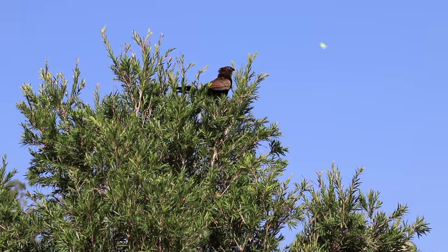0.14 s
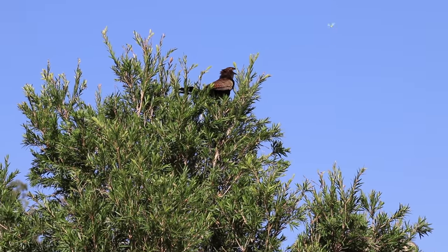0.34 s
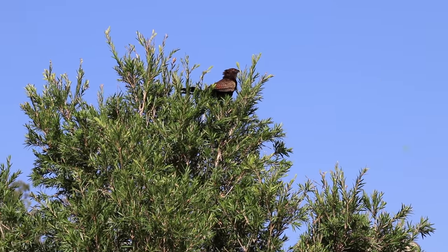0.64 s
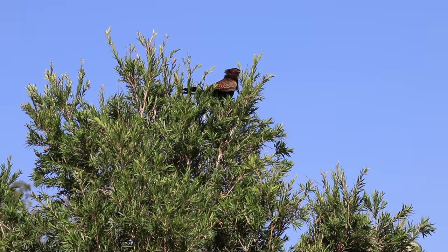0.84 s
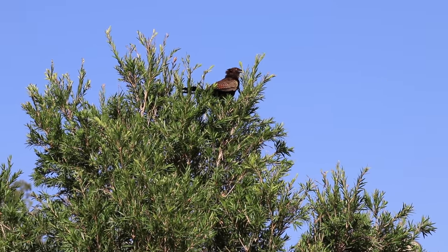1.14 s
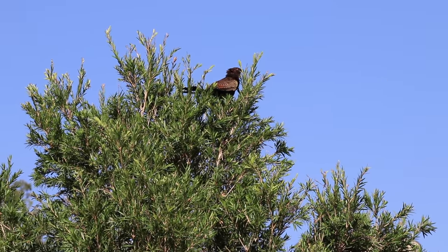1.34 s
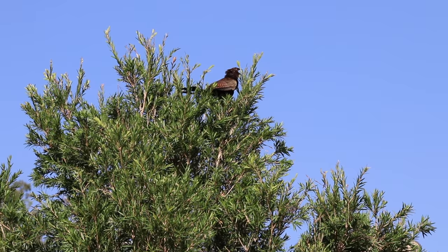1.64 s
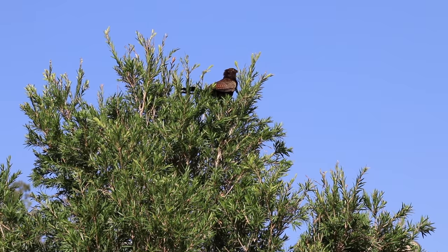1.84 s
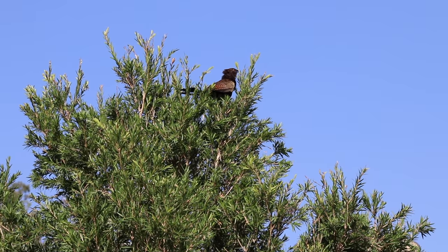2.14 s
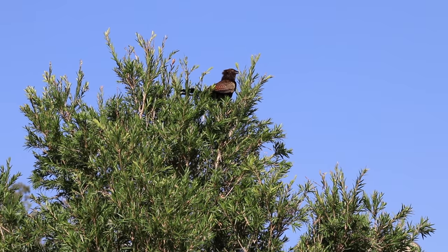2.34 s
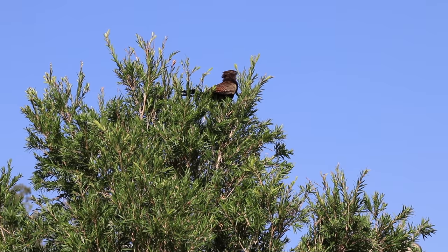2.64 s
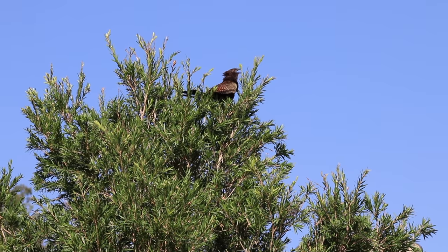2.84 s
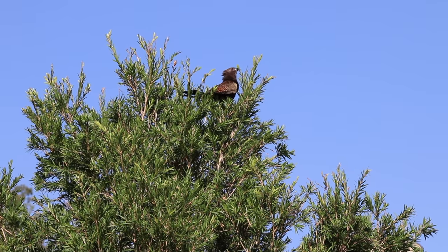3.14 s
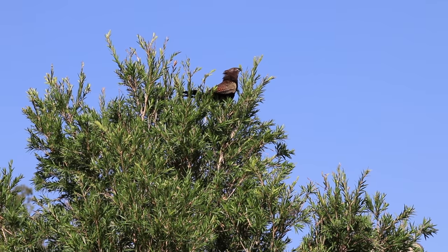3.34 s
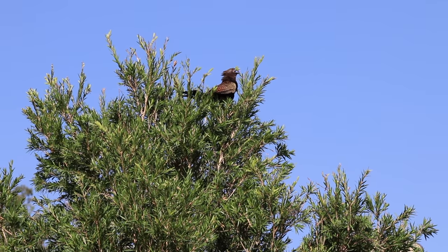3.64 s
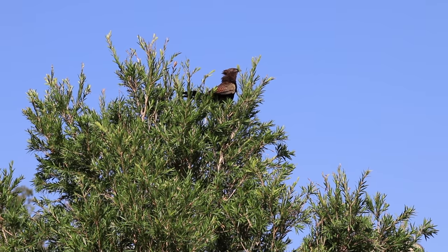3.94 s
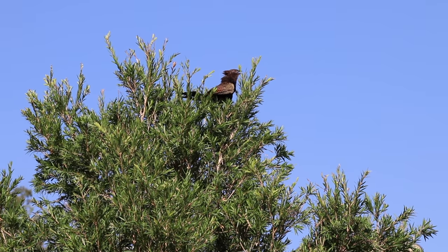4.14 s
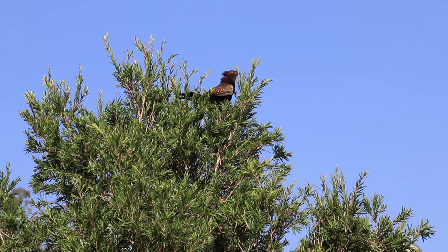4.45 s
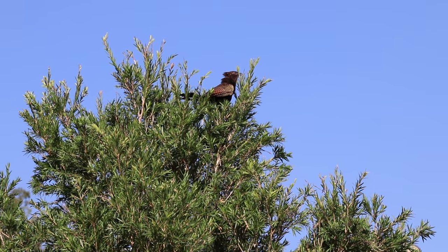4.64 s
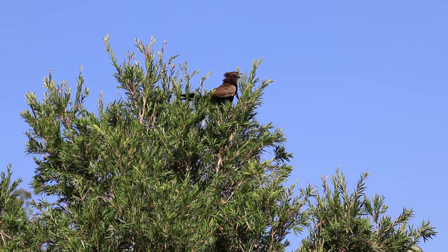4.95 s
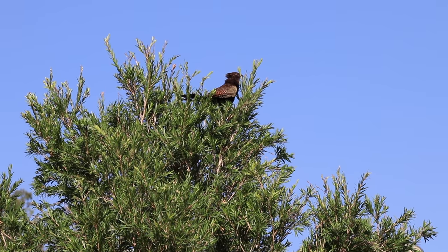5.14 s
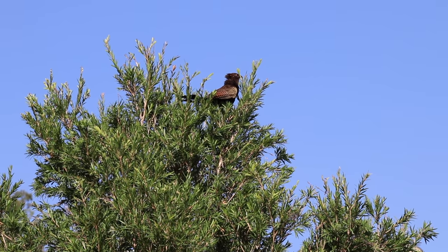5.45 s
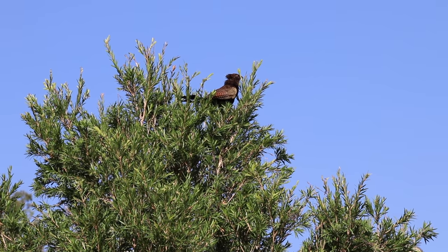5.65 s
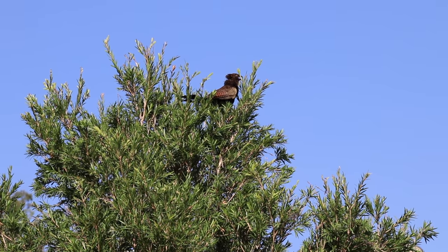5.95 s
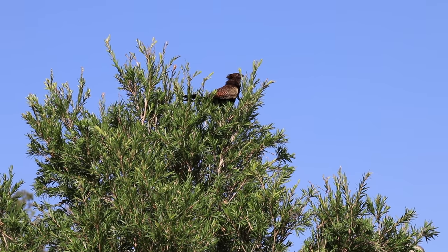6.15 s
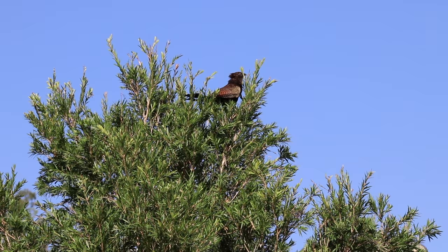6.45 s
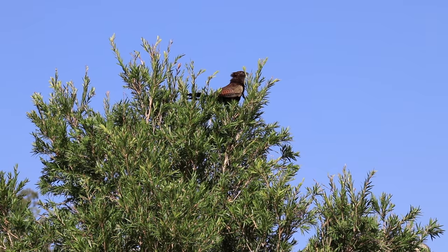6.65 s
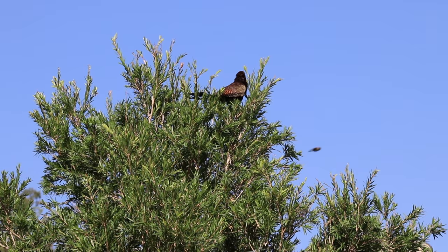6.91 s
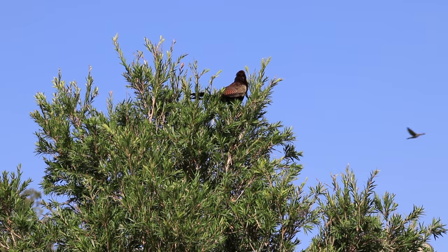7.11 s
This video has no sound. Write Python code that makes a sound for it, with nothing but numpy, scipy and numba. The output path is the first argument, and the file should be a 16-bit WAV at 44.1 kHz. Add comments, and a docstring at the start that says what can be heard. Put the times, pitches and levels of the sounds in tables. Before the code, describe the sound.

A pheasant coucal in a treetop gives a long run of short, raspy, falling coop notes echoing softly through foliage, over faint insect trills.

```python
"""Among trees, a pheasant coucal on a treetop gives a run of harsh, falling notes, which the foliage echoes.
Each note starts as a rasp of chaotic pulses in the syrinx, clears into a tone as its resonance sinks,
and closes with a faint low hoot. Insects trill at high pitch by scraping their wings, crickets chirp,
a small bird twitters once in thin pitch slurs, and a tiny tick of decaying noise sounds near the end.
Behind them lie coloured noise, as far rumble and leaf hiss, and the wavering sines of distant machinery."""
import sys
import numpy as np
from scipy import signal
from scipy.fft import rfft, irfft
from scipy.io import wavfile
from scipy.ndimage import uniform_filter1d, map_coordinates
from numba import njit

SR = 44100
rng = np.random.default_rng(int(sys.argv[2]) if len(sys.argv) > 2 else 0)


def wav_record(signal):
    """Record a signal, one row per channel, as 16-bit PCM in the file named by sys.argv[1]."""
    frames = np.transpose(np.atleast_2d(signal))
    bounded = np.clip(frames, -1, 1)
    # unit amplitude maps onto the largest positive 16-bit level
    quanta = np.round(bounded * 32767).astype(np.int16)
    wavfile.write(sys.argv[1], SR, quanta)


N = 321048


def undb(db):
    """Decibels to amplitude ratio: 20 dB is a factor of ten."""
    return 10 ** (np.asarray(db) / 20)


def unit(x):
    """Normalization to a root-mean-square amplitude of 1."""
    return x / np.sqrt(np.mean(x ** 2) + 1e-18)


def add(out, x, s):
    """Superposition: sum x into out from time s on, cut at the ends of out."""
    start = int(round(s * SR))
    a, b = max(start, 0), min(start + len(x), N)
    out[a:b] += x[a - start:b - start]


def walk(rate, size):
    """Smoothed random motion: held random steps, averaged; spread about 1, about rate turns a second."""
    k = max(int(SR / rate), 2)
    steps = np.repeat(rng.standard_normal(size // k + 2), k)
    return 1.25 * uniform_filter1d(steps, k)[k // 2:k // 2 + size]


def along(points, hz):
    """Interpolation of (f/Hz, value) points on a logarithmic frequency axis."""
    f, value = np.transpose(points)
    return np.interp(np.log(hz + 1), np.log(f), value)


def tone_of(hz):
    """A sine whose phase is the running integral of its instantaneous frequency."""
    return np.sin(2 * np.pi * np.cumsum(hz) / SR)


@njit
def svf(x, hz, width):
    """Second-order resonance (state-variable band-pass) whose centre may move every sample."""
    y, band, low = np.empty(len(x)), 0., 0.
    for i in range(len(x)):
        g, k = np.tan(np.pi * hz[i] / SR), width / hz[i]
        v = (band + g * (x[i] - low)) / (1 + g * (g + k))
        band, low, y[i] = 2 * v - band, low + 2 * g * v, k * v
    return y


def resonate(x, hz, width):
    """Cascaded resonance: two equal band-passes in series steepen the skirts."""
    centre = np.minimum(hz + np.zeros(len(x)), .45 * SR)
    return svf(svf(x, centre, float(width)), centre, float(width))


def steep(x, hz, kind):
    """Eighth-order Butterworth filter: a steep high- or low-pass."""
    return signal.sosfilt(signal.butter(8, hz, kind, fs=SR, output="sos"), x)


def swell(u, peak, spread):
    """Gaussian envelope over the relative time u of a note."""
    return np.exp(-((u - peak) / spread) ** 2)


def distant_air(level_db=-42.5):
    """Diffuse field: coloured noise as far rumble and leaf hiss, more alike at both ears in the bass."""
    # spectrum of the distant air: f/Hz, relative spectral density/dB
    air_spectrum = [(15, -29), (25, -14.5), (86, -7), (107, -13.5), (193, -3), (221, -10.5), (482, -9),
                    (552, -17.5), (1020, -22), (1850, -28), (2010, -29.5), (2300, -31), (7300, -38),
                    (8130, -34), (15500, -43.5)]
    # stereo width of the distant air: f/Hz, side minus mid level/dB
    air_width = [(30, -9), (150, -13), (350, -11.5), (700, -5), (2000, 3), (12000, 0)]
    hz = np.fft.rfftfreq(N, 1 / SR)
    colour = undb(along(air_spectrum, hz))
    width = undb(along(air_width, hz))
    noise = rfft(rng.standard_normal((2, N))) * colour
    mid, side = irfft(noise * np.array([np.ones_like(width), width]), N)
    left_right = mid + side * np.array([[1], [-1]])
    return left_right / np.std(mid) * undb(level_db + 0.87 * walk(4, N))


def machinery():
    """Narrow-band hum: sines of distant machinery, wavering in frequency and level."""
    # partials of the hum: f/Hz, rms level/dB before the wavering
    partials = [(99, -58), (199.5, -51), (301, -56.5), (1815, -64.5)]
    hum = np.zeros(N)
    for f, db in partials:
        level = undb(db + 2 * walk(4.8, N))
        hum += level * np.sqrt(2) * tone_of(f + 3 * walk(14, N))
    return hum


def tick(s=7.09, gain_db=-37, decay_s=.002):
    """Impulsive excitation: a decaying noise burst, band-passed into one tiny, bright tick."""
    out, t = np.zeros(N), np.arange(SR // 20) / SR
    burst = rng.standard_normal(len(t)) * np.exp(-t / decay_s)
    add(out, undb(gain_db) * resonate(burst, 10200, 4500), s)
    return out


def cricket(rate, pitch_hz, db):
    """Amplitude-gated carrier: a far cricket repeats short chirps that sag in pitch."""
    stroke = np.cumsum(rate * (1 + .08 * walk(4.5, N))) / SR % 1
    pitch = pitch_hz * (1 + .25 * (.25 - stroke) + .025 * walk(900, N))
    gate = np.sin(np.pi * np.minimum(2 * stroke, 1)) ** 2  # silent for the second half of each cycle
    return undb(db + 2 * walk(6.5, N)) * unit(gate * tone_of(pitch))


def crickets(chorus_db=-68):
    """Incoherent summation: a chorus blurs into band noise, from which two crickets stand out a little."""
    chorus = undb(chorus_db) * unit(resonate(rng.standard_normal(N), 4250, 470))
    return chorus + cricket(14, 4300, -74.0) + cricket(17, 4550, -67)


def trills(stroke_hz=78, every_s=.245, trill_s=0.18):
    """Stridulation: insects scrape their wings in evenly spaced bursts; every stroke rings one high pitch."""
    # bouts of trills: t/s, length/s, f/Hz, level/dB
    bouts = [(-.08, .4, 7760, -62.5), (1.24, .2, 7730, -64), (2.083, .2, 8240, -68), (2.755, .2, 8210, -60),
             (4.084, .65, 8260, -61.5), (6.197, 1.1, 8220, -60.5)]
    out = np.zeros(N)
    t = np.arange(int(trill_s * SR)) / SR
    stroke = t * stroke_hz % 1
    envelope = np.sqrt(np.sin(np.pi * t / trill_s))
    for s, length, hz, db in bouts:
        for start in np.arange(s, s + length, every_s):
            pitch = hz * (1 + 0.066 * (.5 - stroke) + 0.0092 * walk(400, len(t)))  # sags in each stroke
            ring = tone_of(pitch) * np.sin(np.pi * stroke) ** 2
            add(out, undb(db) * unit(ring * envelope), start)
    return out


def small_bird():
    """Frequency modulation: a quick twitter of thin, wavering notes, most of them slurred."""
    # notes of the twitter: t/s, length/s, start f/Hz, end f/Hz, level/dB
    twitter = [(5.73, 0.039, 5200, 7200, -62), (5.762, .042, 6800, 6750, -59),
               (5.81, 0.033, 6700, 4600, -61), (5.812, 0.043, 4800, 3600, -54.5),
               (5.855, .035, 4700, 3200, -55.5), (5.903, 0.12, 3000, 3000, -61)]
    out = np.zeros(N)
    for s, length, start_hz, end_hz, db in twitter:
        u = np.linspace(0, 1, int(length * SR))
        slur = start_hz + (end_hz - start_hz) * u
        pitch = slur * (1 + 0.036 * walk(1200, len(u)))
        add(out, undb(db) * unit(np.sin(np.pi * u) * tone_of(pitch)), s)
    return out


def throat(x, bands, glide):
    """Formant filtering: throat bands sink together; two interleaved sets swell and fade independently."""
    size = len(x)
    hz = np.fft.rfftfreq(size, 1 / SR)
    inside = (hz > bands[0][0]) & (hz < bands[-1][0])
    spectrum = rfft(x) * undb(along(bands, hz)) * inside
    stripes = np.sin(np.pi * hz / 1900) ** 2
    shaped = np.zeros(size)
    for part in (stripes, 1 - stripes):
        shaped += irfft(spectrum * part, size) * undb(.8 * walk(90, size))
    # reading the sound at a falling rate lowers every band by the same ratio
    return unit(map_coordinates(shaped, [np.cumsum(glide)], order=3, mode="mirror"))


def syrinx(size):
    """Aperiodic excitation: irregular slaps of the membranes, each with a puff of air."""
    cycles = np.cumsum(560 * np.exp(.4 * walk(900, size))) / SR
    slaps = np.diff(np.floor(cycles), prepend=0) * undb(1.5 * walk(600, size))
    puffs = np.exp(-(cycles % 1) / 0.47) * rng.standard_normal(size)
    return unit(slaps) + 0.82 * unit(puffs)


def note(length, start_hz, mid_hz, clearest, rasp_db, hiss_db, sizzle_db):
    """Source and filter: chaotic pulses ring a sinking resonance, and briefly lock on to it as a tone."""
    # upper bands of the throat, from low to high: f/Hz, relative level/dB
    rasp_bands = [(1600, -30), (2050, -1), (2600, -1), (3000, -3.5), (3600, -2.5), (3900, -9.5),
                  (4400, -40)]
    hiss_bands = [(3600, -36), (4200, -2), (4900, -1.5), (5500, 5.5), (5900, 8), (6700, 2.5), (7300, 5.5),
                  (7700, 0), (8300, -39), (11000, -16), (12000, -4), (14500, -28)]
    sizzle_bands = [(8000, -5), (8600, -8), (9050, 5.5), (9800, 5.5), (10400, -2), (11200, -9.5),
                    (12000, -9.5), (12900, -32), (13700, -14), (15500, -21)]
    end_hz = 1180.7
    # the main resonance follows the falling pitch only in part (0-1)
    body_hz, body_width_hz, body_follow = 1336, 705, 0.54
    clear_db, clear_spread, hoot_db = 0, 0.38, -17  # spread as a share of the note

    size = SR // 6
    t = np.arange(size) / SR
    u = t / length
    # the note snaps on, gathers force and is let go smoothly
    attack = 1 - np.exp(-t / .002)
    gather = 1 - np.clip(0.5 * start_hz / 1600, 0, .9) * np.exp(-t / 0.043)
    release = .5 - .5 * np.tanh((u - .97) / .09)
    effort = attack * gather * release
    centre = np.interp(u, [.25, .55, 1], [start_hz, mid_hz, end_hz])
    source = syrinx(size)

    body = resonate(source, body_hz * (centre / body_hz) ** body_follow, body_width_hz)
    body = steep(steep(body, 1076, "high"), 1850 * (start_hz / 1600) ** .5, "low")
    # the body of higher notes starts weaker
    bloom = 1 - np.clip(0.3 * (start_hz / 1600) ** 3, 0, .8) * np.exp(-t / 0.029)
    body = body / np.std(body[u < 1]) * bloom

    tone = np.sqrt(2) * tone_of(centre * (1 + .026 * walk(350, size)))
    tone = tone * undb(clear_db + 1.6 * walk(250, size)) * swell(u, clearest, clear_spread)

    # the rasp leads; the highest bands and a thin nasal ring come up later in the note
    glide = (centre / mid_hz) ** 0.1117
    rasp = throat(source, rasp_bands, glide) * undb(rasp_db) * swell(u, 0.28, 0.4)
    hiss_peak = clearest * (1400 / start_hz) ** 2
    hiss = throat(source, hiss_bands, glide) * undb(hiss_db) * swell(u, hiss_peak, 0.53)
    nasal = 0.57 * unit(resonate(source, 4350, 800)) * swell(u, 0.92, 0.68)
    sizzle = throat(source, sizzle_bands, (centre / 1440) ** 0.17) * swell(u, 0.74, 0.63)
    sizzle = (sizzle + nasal) * undb(sizzle_db)

    # a little of the rough pulsing also passes straight through the chest
    chest = undb(-24) * unit(resonate(source, 810, 700))
    # as the pressure drops the membranes settle into a soft, falling hoot
    hoot = tone_of(np.interp(u, [.9, 1.35], [600, 480])) * swell(u, 1.048, 0.2)
    return effort * (body + tone + rasp + hiss + sizzle + chest) + undb(hoot_db) * hoot


def coucal():
    """Exponential relaxation: fading tension shortens and lowers the notes, while the rasp steadily weakens."""
    # notes: t/s, level/dB, clearest moment (share of the note, 0-1), hiss level/dB
    notes = [(-.062, -23, 0.35, -16.5), (.372, -17.5, 0.59, -16.5), (.792, -18.5, 0.45, -14.5),
             (1.246, -18.5, 0.59, -20.5), (1.662, -18, 0.62, -20), (2.057, -17.5, 0.39, -18),
             (2.453, -18, 0.59, -21), (2.851, -17.5, 0.18, -13), (3.275, -15, 0.49, -20.5),
             (3.695, -17.5, 0.46, -19), (4.123, -17, 0.65, -18), (4.577, -17.5, 0.56, -18),
             (5.028, -17, 0.66, -19), (5.559, -18, 0.64, -26.5), (6.032, -18, 0.62, -23),
             (6.756, -18.5, 0.82, -21)]
    # sizzle near 9 kHz through the run: t/s, level/dB
    sizzle_level = [(0, -28.5), (1.7, -22.5), (2.85, -22.5), (3.7, -16), (4.2, -15), (5.5, -20.5),
                    (7, -21.5)]
    relax_s = 2.203  # time constant
    # relaxed value, and what unit tension adds
    length_s, tense_length_s = .075, 0.01165
    start_hz, tense_start_hz = 1446, 576
    mid_hz, tense_mid_hz = 1376.4, 127
    rasp_db, rasp_db_per_s = -10, -1.07  # at time 0, and its steady fall
    out = np.zeros(N)
    for s, db, clearest, hiss_db in notes:
        tension = np.exp(-s / relax_s)
        call = note(length=length_s + tense_length_s * tension,
                    start_hz=start_hz + tense_start_hz * tension,
                    mid_hz=mid_hz + tense_mid_hz * tension,
                    rasp_db=rasp_db + rasp_db_per_s * s,
                    sizzle_db=np.interp(s, *np.transpose(sizzle_level)),
                    clearest=clearest, hiss_db=hiss_db)
        add(out, undb(db) * call, s)
    return out


def trees(x, wet_db=-2.8, build_s=.03, pileup_db=-25, pileup_t60_s=0.45):
    """Multiple scattering: a few near reflections, and a foliage tail that differs at each ear."""
    # ring of the trees: f/Hz, t60/s, relative level/dB
    ring_bands = [(580, 0.51, 3), (805, 0.39, 10.5), (1165, 0.43, 6.5), (1580, 0.59, -4.5),
                  (2230, 0.41, 3.5), (5000, 0.39, 0), (9500, 0.3, 6.5), (12000, 0.24, -3)]
    # pitches at which the scattered reflections pile up: f/Hz, relative level/dB
    pileups = [(1061, 6), (1110, 8), (1194, 6), (1222, 8), (1302, -19), (1334, -5), (1360, -2.5),
               (1536, -1.5), (1625, -22), (1776, 2)]
    # near reflections: delay/s, level/dB, left minus right level/dB
    echoes = [(.0045, -23.5, 31.5), (0.011, -24, -29), (0.027, -17, 17.5), (0.045, -16.5, -17.5)]
    t = np.arange(SR * 3 // 4) / SR
    hz = np.fft.rfftfreq(len(t), 1 / SR)
    noise = rfft(rng.standard_normal((2, len(t))))
    tail = np.zeros((2, len(t)))
    for k, (_, t60, db) in enumerate(ring_bands):
        # each band fades into its neighbours
        band = along([(row[0], float(j == k)) for j, row in enumerate(ring_bands)], hz)
        tail += irfft(noise * band, len(t)) * np.exp(-np.log(1000) * t / t60) * undb(db)
    for f, db in pileups:
        ring = np.sin(2 * np.pi * (f * t + rng.random((2, 1))))
        tail += undb(db + pileup_db) * ring * np.exp(-np.log(1000) * t / pileup_t60_s)
    tail = tail * (1 - np.exp(-t / build_s))
    # wet_db is the mean gain of the tail over the voice band
    voice_band = (hz > 1000) & (hz < 1800)
    power = np.mean(abs(rfft(tail)[:, voice_band]) ** 2, axis=1, keepdims=True)
    response = tail * undb(wet_db) / np.sqrt(power)
    response[:, 0] += 1  # direct sound
    for delay, db, pan_db in echoes:
        response[:, int(delay * SR)] += undb(db + np.array([pan_db, -pan_db]) / 2)
    return signal.fftconvolve(x[None], response, axes=1)[:, :N]


def scene():
    """Linear superposition: all the animals sound among the same trees, before the far background."""
    animals = crickets() + trills() + small_bird() + coucal()
    return distant_air() + machinery() + tick() + trees(animals)


def record(dry):
    """Band limitation: a steep elliptic low-pass cuts the top of the spectrum, above 15750 Hz."""
    return signal.sosfilt(signal.ellip(10, .2, 70, 15750, fs=SR, output="sos"), dry)


dry = scene()
out = record(dry)
wav_record(out)
```